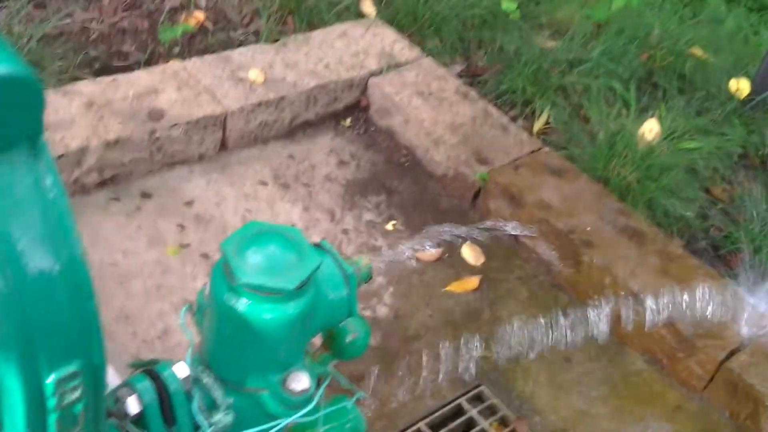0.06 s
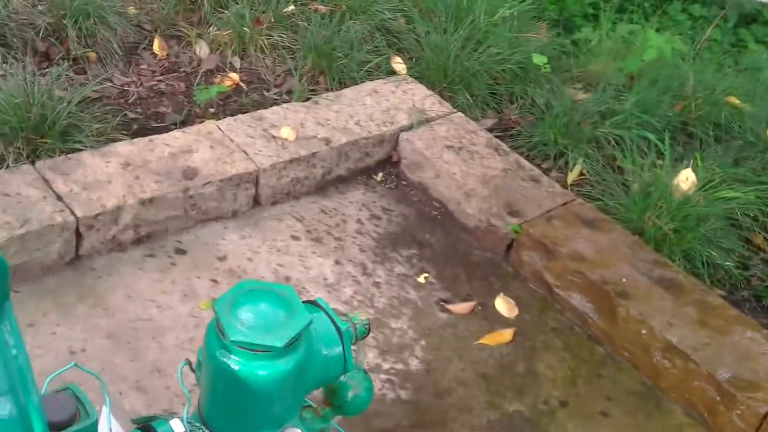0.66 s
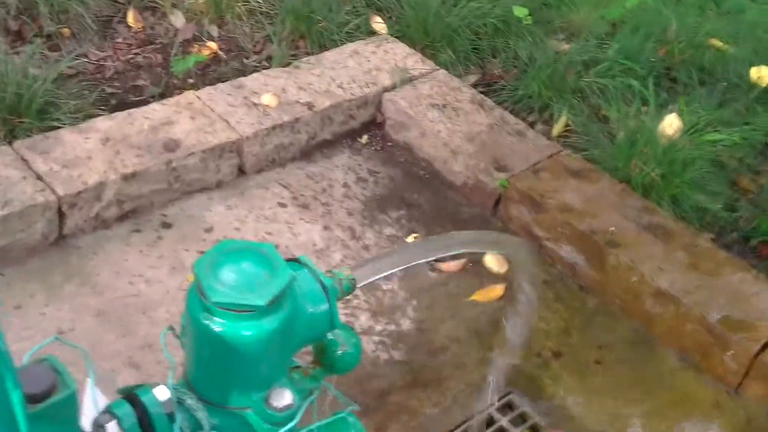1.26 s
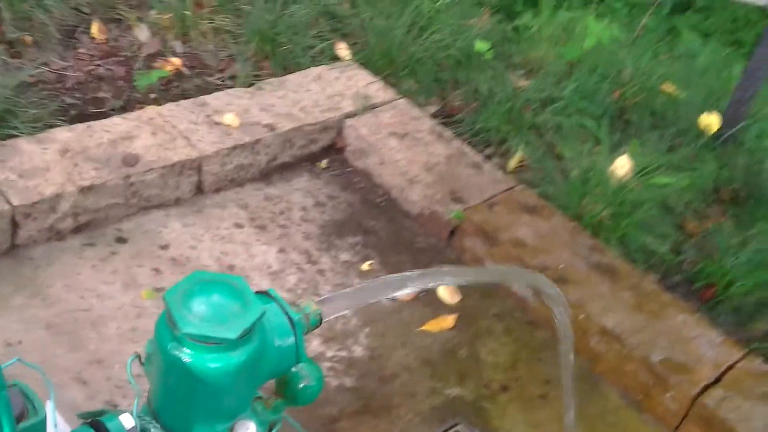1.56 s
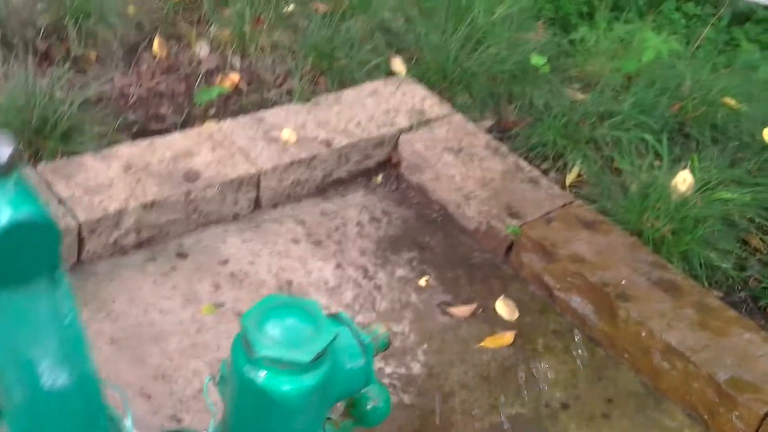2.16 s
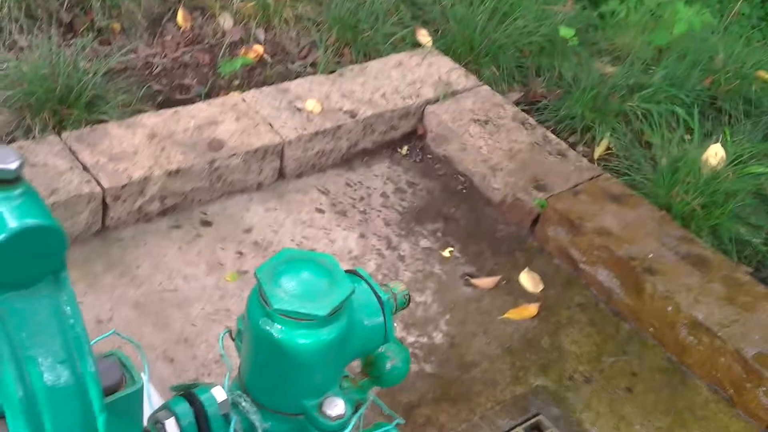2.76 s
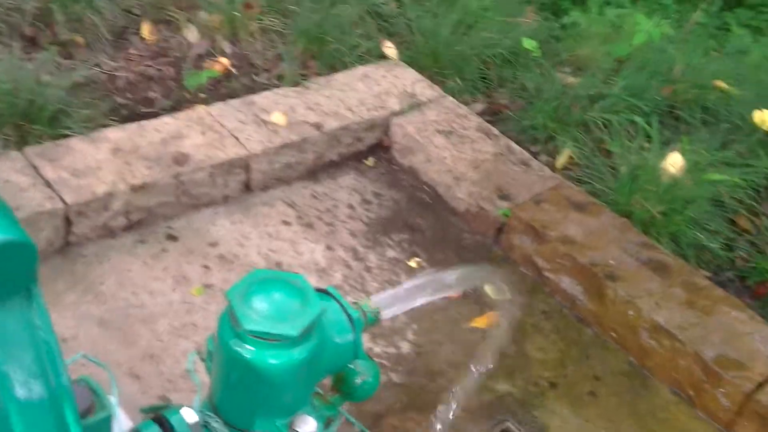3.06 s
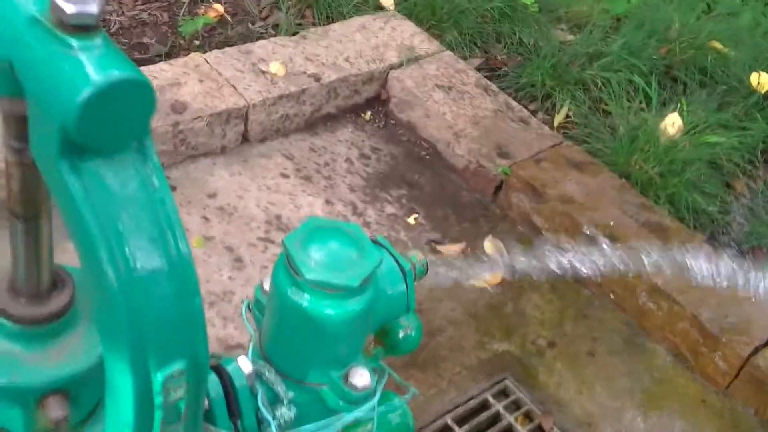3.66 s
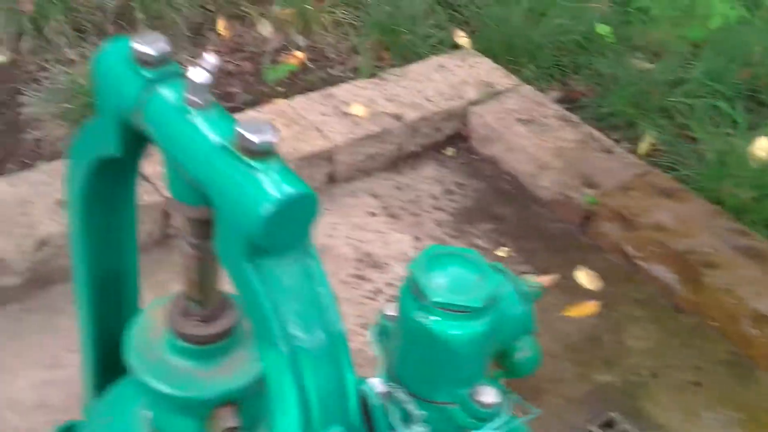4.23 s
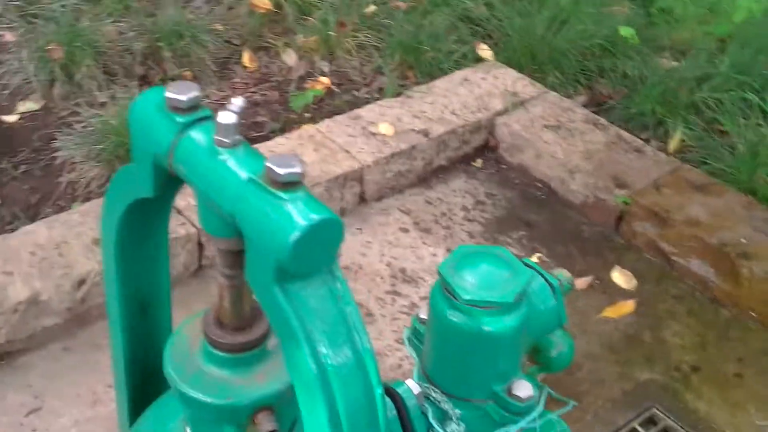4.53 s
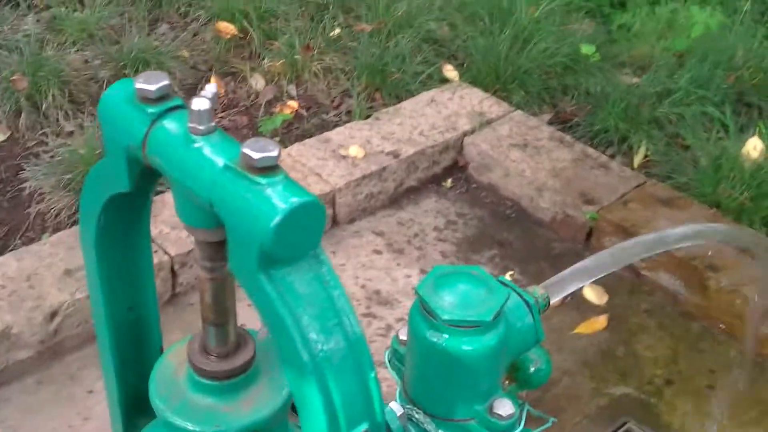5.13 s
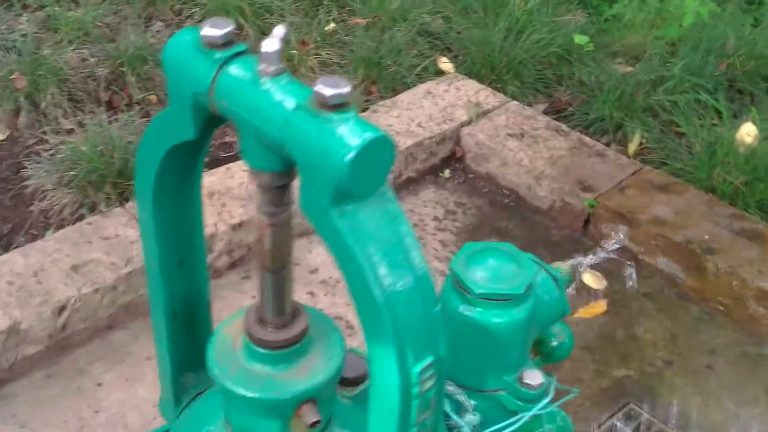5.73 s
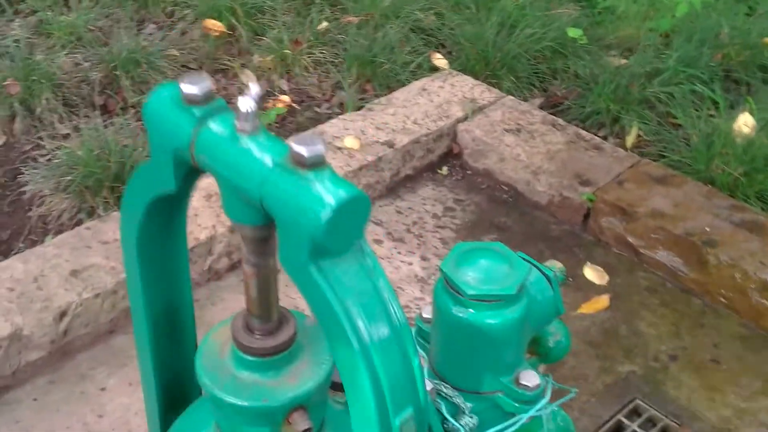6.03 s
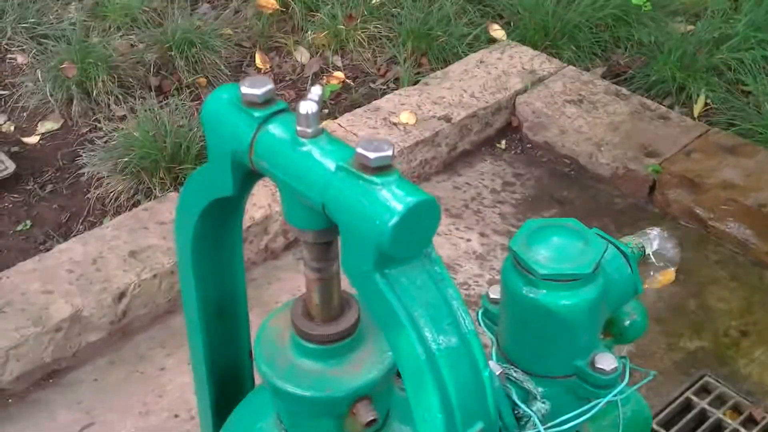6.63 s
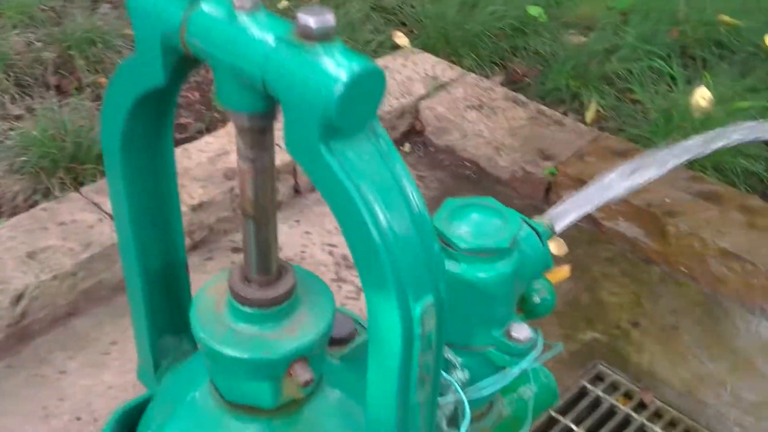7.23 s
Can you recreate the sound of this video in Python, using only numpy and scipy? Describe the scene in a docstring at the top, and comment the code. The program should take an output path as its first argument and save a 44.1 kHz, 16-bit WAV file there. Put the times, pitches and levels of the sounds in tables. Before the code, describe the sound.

A hand pump squeaks and rasps with each stroke, sending spurts of water splashing onto wet paving over faint insects.

```python
"""A cast-iron hand pump in a park

On each stroke, friction drives the dry pivots into squealing and the piston seal rasps by stick-slip.
Air pockets collapse in the valve with a gulp, bubbles ring in the spout, and a jet of water slaps
and spatters on wet paving. Insects shrill far off over a faint outdoor hush."""
import sys
import numpy as np
from scipy import signal
from scipy.io import wavfile
from scipy.ndimage import map_coordinates

SR = 44100
rng = np.random.default_rng(int(sys.argv[2]) if len(sys.argv) > 2 else 0)


def to_wav(sig):
    """Store sig (one row per channel, or 1-D mono) as 16-bit WAV at the path in sys.argv[1].

    Samples outside -1..1 are clipped; the rate is SR.
    """
    pcm = np.clip(np.atleast_2d(sig), -1, 1) * 32767
    pcm = np.round(pcm).astype(np.int16)
    wavfile.write(sys.argv[1], SR, pcm.T)  # frames by channels


N = 321489
TIME = np.arange(N) / SR
BAND_LIMIT_HZ = 15900

# The modes of the iron that the pivots lock onto most firmly.
GROAN_HZ, CREAK_HZ, STRAIN_HZ, SING_HZ, WHISTLE_HZ = 895, 1687, 2588, 2803, 9075
# The pivots jump between modes of the iron as the piston sinks. Each row: start in seconds,
# length in seconds, final pitch in Hz, glide towards it in Hz, level in dB, relative octave level in dB.
PIVOT_SQUEALS = [(.353, 0.02, WHISTLE_HZ, 54, -16.5, -30), (.63, 0.056, 2370, 3, -38, -28),
                 (0.661, 0.005, 1774, 2, -29.5, -17), (0.678, 0.1, SING_HZ, 65, -30.5, -9.5),
                 (.772, 0.0043, 1832, 11, -20.5, -16), (.773, 0.0079, 925, 9, -33.5, -8),
                 (2.519, .092, 2703, -72.5, -29, -9), (2.62, 0.011, 916, 36, -34, -9),
                 (2.624, .036, SING_HZ, 22, -28, -7), (4.373, 0.085, STRAIN_HZ, -1, -20, -14),
                 (4.373, 0.0059, 1537, 0, -33.5, -28), (4.453, 0.017, 1655, -3, -29, -24),
                 (4.483, .021, SING_HZ, -4, -26, -19), (6.022, 0.0083, 2630, -40, -25.5, -4),
                 (6.023, 0.017, 1616, 6, -30.5, -13), (6.042, 0.046, SING_HZ, 0, -30, -9),
                 (6.12, 0.071, 1645, -1, -31, -14), (6.131, 0.061, GROAN_HZ, 2.5, -24, -12),
                 (6.185, 0.032, 2630, 0, -34.5, -24), (6.218, 0.026, CREAK_HZ, 15.5, -16.5, -17.5),
                 (6.269, 0.074, SING_HZ, 9, -25.5, -27)]
# One high squeak begins each lift. Each row: start, swell time and fade time in seconds,
# pitch in Hz, drift in Hz per second, level at the crest in dB.
LIFT_SQUEAKS = [(1.123, 0.049, 0.074, 4110, -600, -32.5), (3.014, 0.08, 0.14, 4190, 96, -26),
                (4.895, 0.055, 0.12, 4235, -4, -28), (6.71, 0.11, 0.15, 4230, 955, -24.5)]
# A pivot grinds instead of singing. Each row: time in seconds, level in dB.
GRIND_LEVELS = [(6.09, -45), (6.11, -25), (6.14, -27.5), (6.185, -32), (6.205, -63)]
# The seal judders along the barrel. Each row: start in seconds, length in seconds,
# relative level in dB, decay time of a slip as a fraction of one judder.
SEAL_RASPS = [(0.909, 0.14, -39, 0.94), (2.807, .15, -41, 0.31), (4.71, 0.13, -41.5, 0.27),
              (5.054, 0.039, -43.5, 0.36), (6.573, 0.1, -37, 0.18)]
# Air modes of the barrel. Each row: frequency in Hz, bandwidth in Hz, relative level in dB.
BARREL_MODES = [(750, 40, -5), (1140, 100, -4), (1430, 36, -3), (1650, 42, 0), (2120, 150, -3),
                (2400, 75, 1), (2700, 42, -4), (3170, 40, -7), (3500, 49, -4)]
# Air pockets collapse in the valve. Each row: time in seconds, relative level in dB, sweep in seconds.
VALVE_GULPS = [(3.134, -4.5, 0.0058), (3.1627, 2, 0.00019), (3.184, -9, 0.0011), (3.2108, -7, 0.003),
               (3.2353, -9.5, 0.0022), (3.246, -3.5, 0.00038), (3.277, -7, 0.0015), (3.2866, -2.5, 0.0007),
               (3.3005, -13, .0016), (3.31, -6.5, 0.00089), (3.3236, -12, 0.002), (3.334, -7, 0.00074),
               (3.3483, -8, 0.0017), (6.8628, -5, 0.0021), (6.876, -0.5, 0.0021), (6.899, -23, .005),
               (6.9255, -15, 0.0038), (6.9485, -7, 0.00065), (6.9722, -3.5, 0.00085)]
# Bubble clusters in the spout. Each row: start and length in seconds, level in dB, typical pitch in Hz.
SPOUT_BUBBLES = [(1.087, 0.066, -33.5, 1860), (1.29, 0.021, -34.5, 1610), (1.398, 0.0089, -36.5, 3460),
                 (2.034, 0.074, -33, 1330), (2.801, 0.026, -36.5, 1510), (3.411, 0.0062, -32, 3250),
                 (5.354, 0.0038, -31, 3480), (5.462, .012, -36.5, 910), (7.058, 0.042, -45, 3200)]
# Jets and dollops land. Each row: start and length in seconds, relative spatter and spray levels in dB.
WATER_POURS = [(0, .28, -32, -36), (0.22, 0.034, -33, -33), (0.316, .01, -36, -32), (0.441, 0.01, -34, -36),
               (0.609, .04, -48, -56), (0.83, 0.014, -44, -46), (1.434, .03, -46, -41.5),
               (1.59, 0.087, -32.5, -35), (1.63, 0.02, -25.5, -37), (1.71, .12, -42, -46),
               (1.85, 0.72, -46.5, -46.5), (2.008, 0.11, -32.5, -41.5), (2.201, 0.037, -29.5, -35.5),
               (2.355, 0.13, -35, -42.5), (3.412, 0.063, -42, -48), (3.505, 0.48, -33, -36.5),
               (3.55, 0.031, -28.5, -37.5), (3.887, 0.026, -26.5, -30), (4.003, 0.0087, -26, -34.5),
               (4.137, 0.034, -31.5, -36), (5.248, 0.013, -43.5, -44), (5.365, .17, -31.5, -37),
               (5.545, 0.35, -39, -37), (5.872, 0.018, -24, -32), (6.035, 0.038, -32, -40),
               (7.046, 0.025, -35, -42), (7.183, 0.093, -30, -33)]
# Lumps of water hit stone. Each row: time in seconds, relative level in dB, pitch of trapped air in Hz.
WATER_SLAPS = [(0.008, -12, 2770), (0.184, -6, 2600), (0.244, -8, 2850), (0.258, -5.5, 2840),
               (0.325, -6.5, 3350), (0.619, -11.5, 5970), (1.634, -9.5, 3200), (1.657, -7, 4540),
               (1.723, -5.5, 6400), (2.013, -12.5, 8090), (2.035, -13.5, 1590), (2.366, -12.5, 945),
               (2.383, -11, 3730), (2.473, -14.5, 4300), (3.478, 0, 3170), (3.67, -10, 3300),
               (3.781, -5, 5500), (3.807, -12, 2400), (3.866, -7, 4850), (3.905, -2, 5400),
               (3.97, -8, 6300), (4.005, -6, 3240), (4.15, -5.5, 4700), (4.22, -18, 4200),
               (5.372, -5, 5600), (5.506, -4.5, 8300), (5.524, -5.5, 4860), (5.566, -3, 8800),
               (5.692, -7.5, 5000), (5.72, -14, 8100), (5.778, -9, 4700), (5.827, -9, 3400),
               (5.848, -9, 6500), (5.879, -10.5, 1830)]
# The jet digs a hollow in the puddle. Each row: time in seconds, lower resonance in Hz, its level in dB.
PUDDLE_CAVITY = [(0, 814, -39.5), (.12, 637, -35), (.23, 690, -42), (3.56, 840, -41), (3.68, 733, -34),
                 (3.77, 810, -34), (3.86, 870, -42)]
# The insect chorus. Each row: time in seconds, centre frequency in Hz, level in dB.
INSECT_BAND = [(0, 7260, -44.5), (2.3, 7350, -44), (3.1, 8440, -44.5), (7.2, 8180, -44)]

# Spectra of the noises. Each row: frequency in Hz, relative spectral density in dB.
GRIND_SPECTRUM = [(200, -32), (650, -5), (1100, 7), (1500, -1), (2300, -3.5), (3400, -11), (6000, -19)]  # iron on iron
RASP_SPECTRUM = [(60, -64), (200, -29), (600, -16), (1600, 5.5), (3000, -12.5), (4300, -16.5), (10000, -18)]  # the slipping seal
FROTH_SPECTRUM = [(120, -16.5), (450, -3.5), (1400, 1), (3000, -2), (5000, -17), (10000, -10)]  # churned water around a gulp
SPATTER_SPECTRUM = [(120, -24), (350, -36.5), (700, -5.5), (1500, 3), (3000, 3.5), (5500, 3), (8000, -3),
                    (12000, -33)]  # heavy drops
SPRAY_SPECTRUM = [(200, -65), (1500, -42), (4000, -1.5), (7000, -3), (9500, 1.5), (12500, -2),
                  (15500, -2.5)]  # fine drops
HUSH_SPECTRUM = [(25, -25), (70, -18), (160, -3.5), (350, 1), (800, 2), (1500, -3.5), (3000, -12),
                 (7000, -9), (11000, -18.5), (16000, -23)]  # the open air


def squeals():
    """Self-excited vibration: friction feeds a mode of the iron; low modes chatter most."""
    sag_db = -3  # each squeal tires over its length
    out = np.zeros(N)
    for start, length, hz, glide_hz, db, octave_db in PIVOT_SQUEALS:
        t = np.arange(-.03, length + .06, 1 / SR)
        progress = np.clip(t / length, 0, 1)
        chatter = SING_HZ / hz
        tone = pivot(hz + glide_hz * (progress - 1), db + sag_db * progress, second_db=octave_db,
                     third_db=-29, jitter=0.006 * chatter ** 2, flutter_db=1.2 * chatter)
        add(out, start + t[0], tone * self_excited(t, length))
    return out


def squeaks():
    """Beating: as a lift loads the pivot, its squeak swells and a neighbouring mode roughens it."""
    scoop_hz, scoop_s = 148, 0.0194  # the pitch scoops up, overshoots and settles
    out = np.zeros(N)
    for start, swell, fade, hz, drift, db in LIFT_SQUEAKS:
        t = np.arange(-.015, swell + fade + .06, 1 / SR)
        scoop = scoop_hz * np.exp(-t / scoop_s) * np.cos(np.pi * np.maximum(t, 0) / scoop_s / 1.3)
        pitch = hz + drift * (t - swell) - scoop + 18 * wander(len(t), per_s=34)
        load_db = np.interp(t, [0, swell, swell + fade], [-12, 0, -17.5])
        tone = pivot(pitch, db + load_db, second_db=-20, third_db=-17, jitter=0.0056, flutter_db=4.6)
        neighbour = rng.standard_normal(len(t))
        for _ in range(2):
            neighbour = resonate(neighbour, pitch * 1.045, width=150)
        neighbour = unit(neighbour) * amp(db - 16 + 2 * load_db)
        add(out, start + t[0], (tone + neighbour) * self_excited(t, swell + fade))
    return out


def pivot(hz, db, second_db, third_db, jitter, flutter_db):
    """Mode locking: dry iron holds a steady tone when driven hard, and chatters when driven weakly."""
    n = len(hz)
    loose = np.clip((-20 - db) / 13, .3, 1)
    phase = 2 * np.pi * np.cumsum(hz * (1 + jitter * loose * wander(n, per_s=300))) / SR
    bite = np.sqrt(loose) * amp(2 * wander(n, per_s=71))  # overtones come and go with the contact
    overtones = sum(amp(level) * np.sin(k * phase) * (k * hz < BAND_LIMIT_HZ)
                    for k, level in [(2, second_db), (3, third_db)])
    gain = np.sqrt(2) * amp(db + flutter_db * loose * wander(n, per_s=240))
    return gain * (np.sin(phase) + bite * overtones)


def self_excited(t, length, grow_s=0.0046, ring_s=0.0063):
    """Envelope of a self-excited vibration: exponential growth, saturation, then free decay."""
    return np.exp(-np.maximum(t - length, 0) / ring_s) / np.sqrt(1 + np.exp(-2 * t / grow_s))


def grind():
    """Sliding friction that locks onto no mode radiates broadband noise."""
    out = np.zeros(N)
    for t, (db,) in phrases(GRIND_LEVELS):
        add(out, t[0], amp(db) * colour(rng.standard_normal(len(t)), GRIND_SPECTRUM))
    return out


def rasps():
    """Stick-slip: the seal moves in short bursts that excite the air modes of the barrel."""
    slips = np.zeros(N)
    for start, length, db, linger in SEAL_RASPS:
        n = int(length * SR)
        judders = np.cumsum(53 * np.exp(.25 * wander(n, per_s=28))) / SR  # about 53 a second
        grains = np.cumsum(330 * np.exp(0.37 * wander(n, per_s=170))) / SR  # finer pulses within them
        burst = rng.standard_normal(n) * np.exp(-(grains % 1) / 0.39 - (judders % 1) / linger)
        arch = 1.8 + np.sin(np.linspace(0, np.pi, n))
        add(slips, start, amp(db + 1) * unit(burst * arch))
    ring = sum(amp(db) * resonate(slips, hz, width) for hz, width, db in BARREL_MODES)
    return amp(-7) * colour(slips, RASP_SPECTRUM) + unit(ring) * np.std(slips)


def gulps():
    """An air pocket's resonance rises as it shrinks, until it snaps shut and knocks on the barrel."""
    low_hz = 520
    typical_top_hz, typical_sweep_s, typical_db = 5580, 0.0017, -6
    out, t = np.zeros(N), np.arange(-SR // 50, SR // 50) / SR
    for time, db, sweep in VALVE_GULPS:
        # a quicker or harder collapse sweeps higher
        top_hz = typical_top_hz * (typical_sweep_s / sweep) ** 0.087 * amp(db - typical_db) ** 0.54
        hz = low_hz + (top_hz - low_hz) * (1 + np.tanh(t / sweep * 2.25)) / 2
        chirp = (1500 / hz) ** 0.16 * np.cos(2 * np.pi * (np.cumsum(hz) / SR + rng.random()))
        swell = np.exp(-(t / (sweep * 0.54)) ** 2) + 0.16 * np.exp(-abs(t) / 0.0018) * (t < 0)
        churn = np.exp(-abs(t) / 0.016) * np.where(t > 0, .09, .03)
        froth = colour(rng.standard_normal(len(t)), FROTH_SPECTRUM) * churn
        add(out, time + t[0], amp(db - 7.5) * (chirp * swell + froth))
    knock = (0.56 * resonate(out, 522, width=62) + resonate(out, 680, width=116)
             + resonate(out, 1318, width=34))
    return signal.sosfilt(signal.butter(2, 220, "high", fs=SR, output="sos"), out + amp(3) * knock)


def splash():
    """Jet breakup: spatter and spray land in clumps, and a thin flow parts into separate drips."""
    spatter_db, spray_db = flow()
    clumps_db = 3.11 * wander(N, per_s=120)
    thin = np.clip((-35.5 - spray_db) / 24, 0, .8)
    drips = drops(per_s=390, spread_db=3.5, cycles=5.9, mist=0.5) * np.sqrt(thin)
    heavy = drops(per_s=4500, spread_db=6.5, cycles=3.8, mist=0.56) * np.sqrt(1 - thin)
    fine = drops(per_s=12000, spread_db=6.0, cycles=2.9, mist=0.27) * np.sqrt(1 - thin)
    plinks = drops(per_s=600, spread_db=6, cycles=9.5, mist=0)  # drops that trap a bubble ring longer
    spatter = colour(0.9 * heavy + drips + 0.41 * plinks, SPATTER_SPECTRUM) * amp(spatter_db + clumps_db)
    spray = colour(fine + drips, SPRAY_SPECTRUM) * amp(spray_db + clumps_db + 4)
    return spatter + spray


def flow():
    """Incoherent sources add in power: pours and their drips give the spatter and spray levels in dB."""
    power, t = np.zeros((2, N)), np.arange(2 * SR) / SR
    for start, length, *levels_db in WATER_POURS:
        pour = held(t, length, rise_s=0.0056, release_s=0.021)
        dripping_back = amp(-14.5) * held(t, length, rise_s=length, release_s=0.23)
        for layer, db in zip(power, levels_db):
            add(layer, start, amp(db) ** 2 * (pour ** 2 + dripping_back ** 2))
    return 10 * np.log10(power + 1e-12)


def drops(per_s, spread_db, cycles, mist):
    """Shot noise: random drops each ring for a few cycles, over a mist too fine to resolve."""
    pitches = np.linspace(22, 127, 40) ** 2
    arrivals = np.flatnonzero(rng.random(N) < per_s / SR)
    size = amp(spread_db * np.minimum(rng.exponential(1, N), 4))[arrivals]
    kind = rng.integers(0, len(pitches), N)[arrivals]
    out = np.zeros(N)
    for k, hz in enumerate(pitches):
        hits = np.bincount(arrivals[kind == k], size[kind == k], N)
        angle, r = 2 * np.pi * hz / SR, np.exp(-hz / cycles / SR)
        gain = np.sin(angle) * np.sqrt((1 - r * r) * np.sqrt(hz))  # equal power per Hz
        out += signal.lfilter([gain], [1, -2 * r * np.cos(angle), r * r], hits + 1e-18)
    return unit(unit(out) + mist * rng.standard_normal(N))


def slaps():
    """Impact: each lump of water cracks on the stone, rings the air it traps and throws off a fizz."""
    out, t = np.zeros(N), np.arange(SR // 25) / SR
    onset = 1 - np.exp(-t / .00006)
    for time, db, hz in WATER_SLAPS:
        crack, fizz = rng.standard_normal((2, len(t)))
        ring = np.sin(2 * np.pi * hz * t) * np.exp(-t * hz / 3.86)
        burst = 0.42 * crack * np.exp(-t / 0.0013) + 0.057 * fizz * np.exp(-t / 0.002)
        add(out, time, amp(db - 0.5) * (1.02 * ring + burst) * onset)
    # the slaps carry no bass
    return signal.sosfilt(signal.butter(3, 600, "high", fs=SR, output="sos"), out)


def hollow():
    """Cavity resonance: the full jet drives two modes of the hollow that it digs in the puddle."""
    out = np.zeros(N)
    for t, (hz, db) in phrases(PUDDLE_CAVITY):
        jet = rng.standard_normal(len(t))
        low = unit(resonate(resonate(jet, hz, width=160), hz, width=160))
        high = unit(resonate(resonate(jet, hz * 1.88, width=220), hz * 1.93, width=220))
        add(out, t[0], amp(db) * (low + amp(-5) * high))
    return out


def bubbles():
    """Each bubble is a damped oscillator whose pitch rises as it nears the surface."""
    out, t = np.zeros(N), np.arange(SR // 50) / SR
    for start, length, db, hz in SPOUT_BUBBLES:
        cluster = np.zeros(int(length * SR) + len(t))
        spread = min(length * 18, .5)  # a long gurgle holds bubbles of many sizes
        for birth in np.arange(0, length, .0045):
            late, size, strength = rng.random(3)
            pitch = hz * np.exp(spread * (2 * size - 1)) * (0.868 + spread * t / 0.01)
            ring = np.sin(2 * np.pi * np.cumsum(pitch) / SR) * t * np.exp(-t / 0.0014)
            add(cluster, birth + late * 0.00362, (.5 + strength) * ring)
        add(out, start, amp(db) * cluster * np.sqrt(length * SR) / np.linalg.norm(cluster))
    return out


def tail(x, wet_db, t60):
    """Reverberation: sparse echoes, dying by 60 dB in t60 seconds, follow the direct sound."""
    t = np.arange(SR // 3) / SR
    echoes = rng.standard_normal(len(t)) * (rng.random(len(t)) < .06)
    echoes *= amp(-60 * t / t60) * (t > .002)
    return x + amp(wet_db) * signal.oaconvolve(x, echoes / np.linalg.norm(echoes))[:N]


def insects():
    """Superposition: many distant insects merge into one drifting band of noise."""
    hz, db = curves(INSECT_BAND)
    band = signal.sosfilt(signal.butter(4, 1150, fs=SR, output="sos"), rng.standard_normal(N))
    carrier = np.cos(2 * np.pi * np.cumsum(hz + 380 * wander(N, per_s=2500)) / SR)
    return unit(band * carrier) * amp(db + 0.23 * wander(N, per_s=23))


def hush():
    """Ambient noise: a faint, broad hush whose level wavers slightly."""
    return colour(rng.standard_normal(N), HUSH_SPECTRUM) * amp(-46 + 1.34 * wander(N, per_s=22))


def amp(db):
    """Decibels to amplitude ratio."""
    return 10 ** (np.asarray(db) / 20)


def unit(x):
    """Normalisation to rms 1."""
    return x / np.sqrt(np.mean(x ** 2) + 1e-20)


def add(mix, start, sound):
    """Superposes a sound on the mix, from start in seconds."""
    part = mix[max(round(start * SR), 0):][:len(sound)]
    part += sound[:len(part)]


def curves(rows, t=TIME):
    """Linear interpolation of a table's columns in time."""
    times, *columns = np.transpose(rows)
    return [np.interp(t, times, column) for column in columns]


def phrases(rows, gap_s=1):
    """Splits a table at its pauses; yields the times and curves of each part."""
    rows = np.array(rows)
    for part in np.split(rows, np.flatnonzero(np.diff(rows[:, 0]) > gap_s) + 1):
        t = np.arange(part[0, 0], part[-1, 0], 1 / SR)
        yield t, curves(part, t)


def held(t, length, rise_s, release_s):
    """Envelope: a smooth rise, a hold until length, an exponential release."""
    rise = np.sin(np.pi / 2 * np.clip(t / rise_s, 0, 1)) ** 2
    return rise * np.exp(-np.maximum(t - length, 0) / release_s)


def wander(n, per_s):
    """Smooth random modulation of rms near 1, changing per_s times a second."""
    knots = rng.standard_normal(N // 8)
    return map_coordinates(knots, [np.arange(n) * per_s / SR], order=2, mode="wrap")


def colour(x, spectrum):
    """Minimum-phase filter with the given spectrum; it conserves the power of white noise."""
    points_hz, db = np.transpose(spectrum)
    hz = abs(np.fft.fftfreq(4096, 1 / SR))
    log_gain = np.log(amp(np.interp(np.log(hz + 1), np.log(points_hz), db)))
    taps = np.fft.ifft(np.exp(signal.hilbert(log_gain).conj())).real[:len(hz) // 2]
    return signal.oaconvolve(x, taps / np.linalg.norm(taps))[:len(x)]


def resonate(x, hz, width):
    """Resonance of gain 1 and bandwidth width in Hz, able to follow a pitch curve."""
    phasor = np.exp(2j * np.pi * np.cumsum(hz * np.ones(len(x))) / SR)
    r = np.exp(-np.pi * width / SR)
    return 2 * (phasor * signal.lfilter([1 - r], [1, -r], x / phasor + 1e-18)).real


def scene():
    """The sources add in open air: paving scatters the water and seal sounds, and the iron rings on."""
    water_and_seal = splash() + slaps() + hollow() + gulps() + bubbles() + rasps()
    scattered = tail(water_and_seal, wet_db=-8.0, t60=0.065)
    iron = tail(squeals() + squeaks() + grind(), wet_db=-14, t60=0.25)
    return (scattered + iron + insects() + hush())[None]


def record(dry):
    """Soft saturation rounds off the sharpest slaps; a low-pass filter then limits the band."""
    low_pass = signal.firwin(401, BAND_LIMIT_HZ, window=("kaiser", 8), fs=SR)
    return signal.oaconvolve(np.tanh(dry), low_pass[None], "same")


dry = scene()
out = record(dry)
to_wav(out)
```